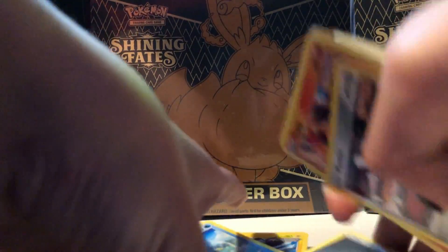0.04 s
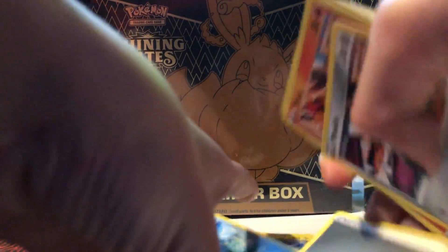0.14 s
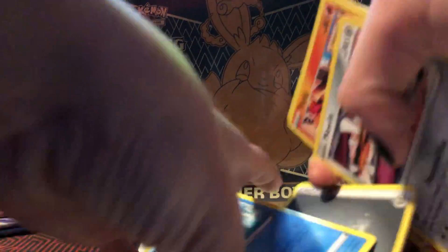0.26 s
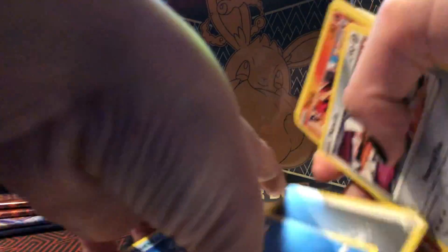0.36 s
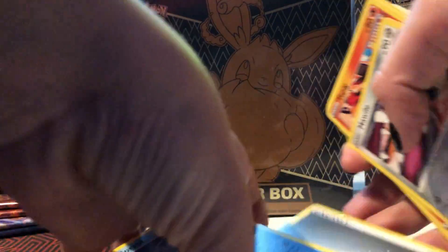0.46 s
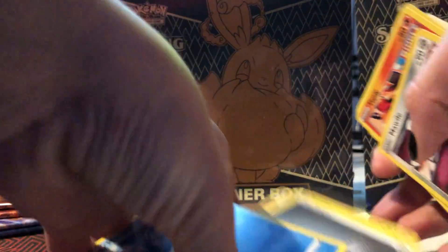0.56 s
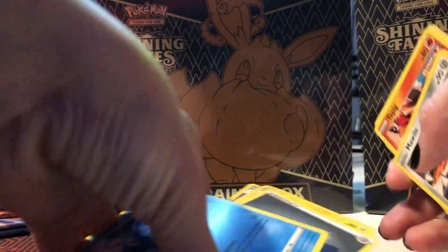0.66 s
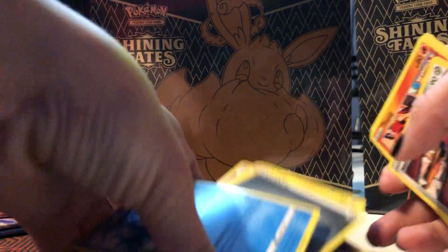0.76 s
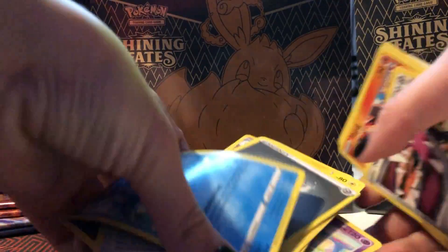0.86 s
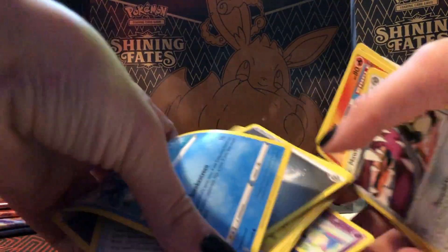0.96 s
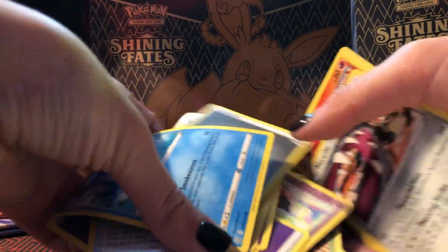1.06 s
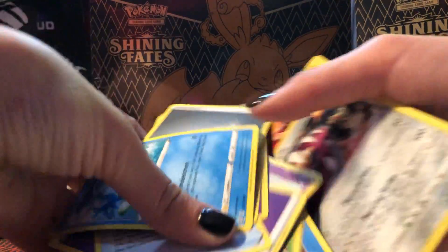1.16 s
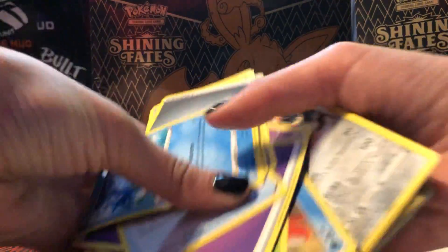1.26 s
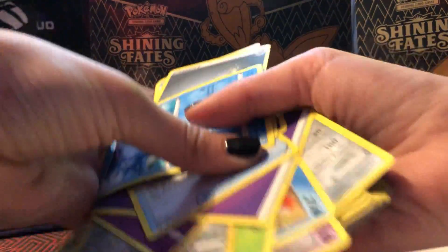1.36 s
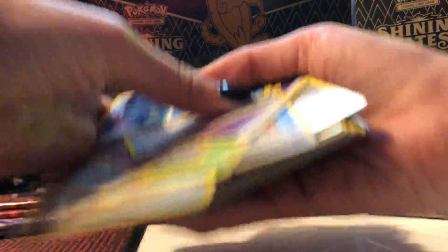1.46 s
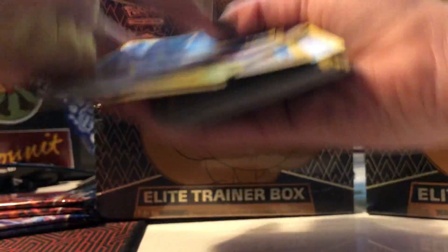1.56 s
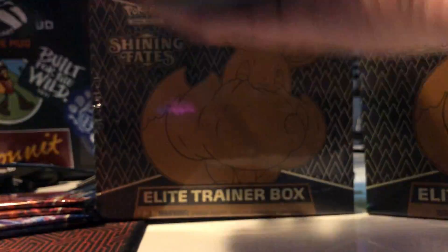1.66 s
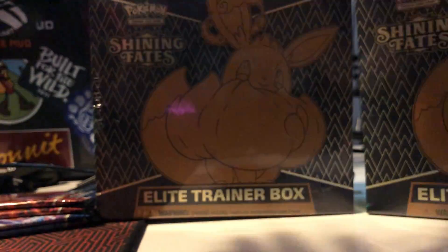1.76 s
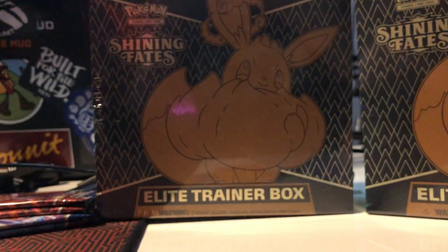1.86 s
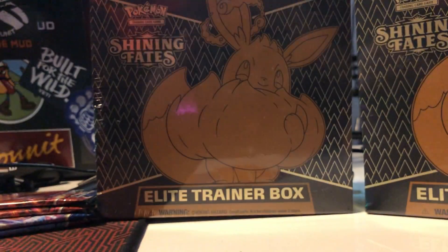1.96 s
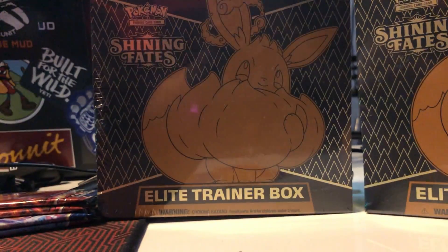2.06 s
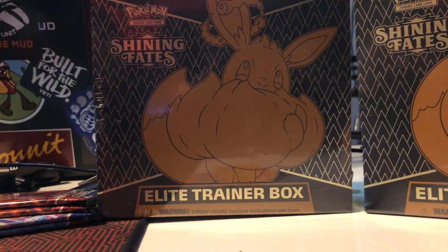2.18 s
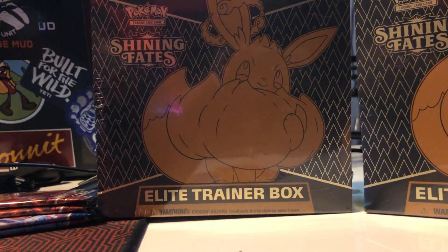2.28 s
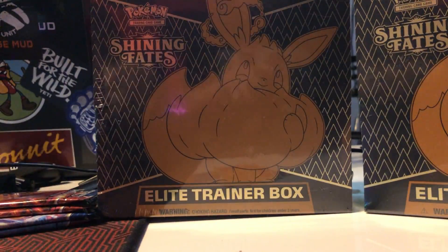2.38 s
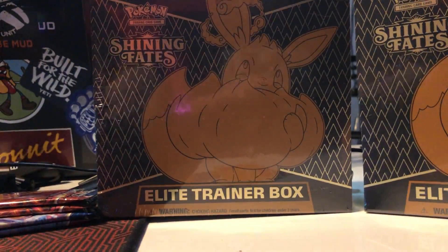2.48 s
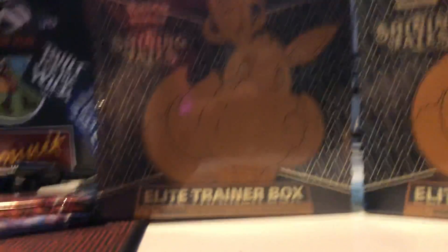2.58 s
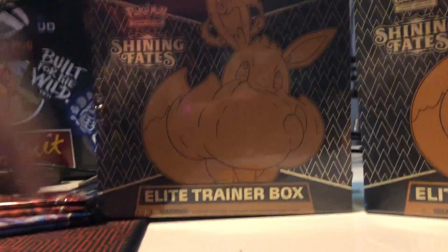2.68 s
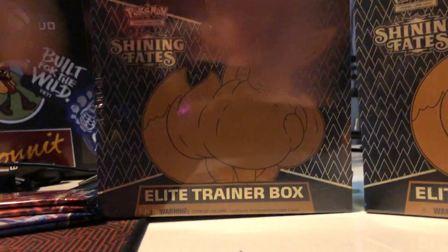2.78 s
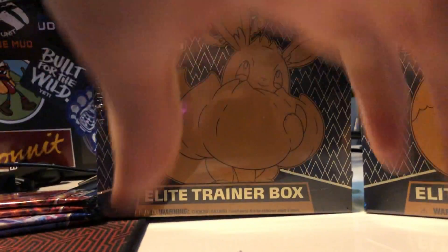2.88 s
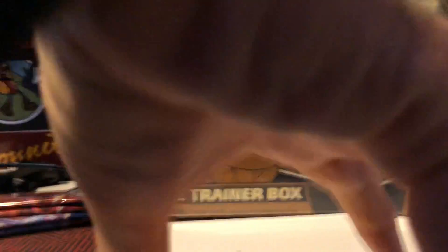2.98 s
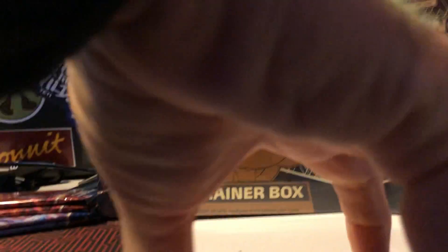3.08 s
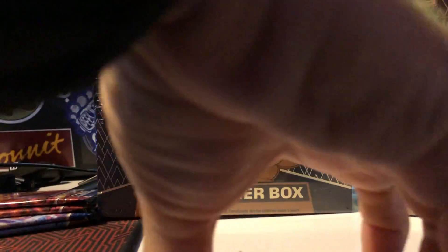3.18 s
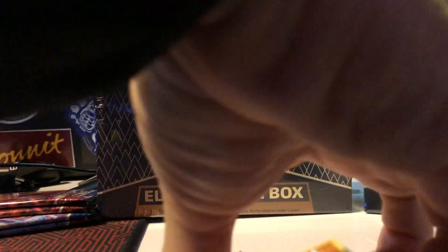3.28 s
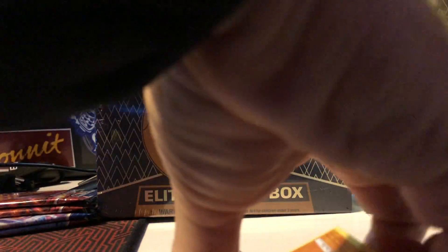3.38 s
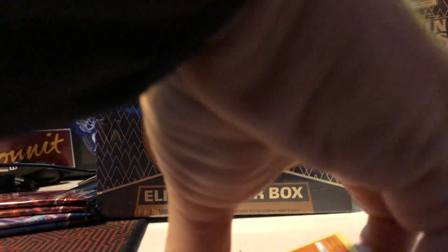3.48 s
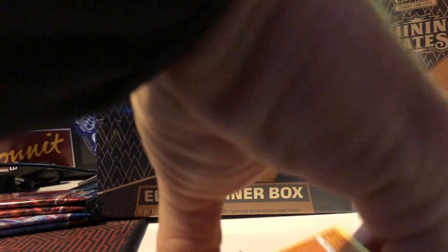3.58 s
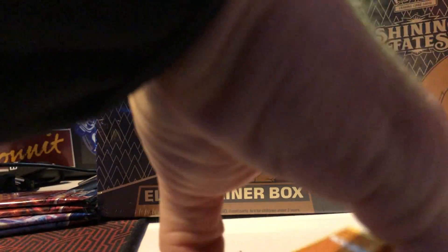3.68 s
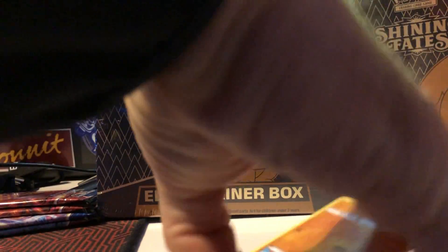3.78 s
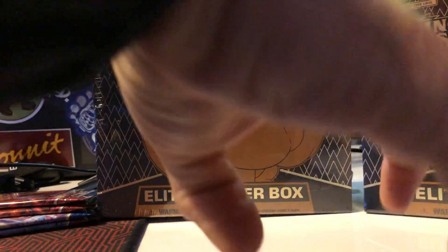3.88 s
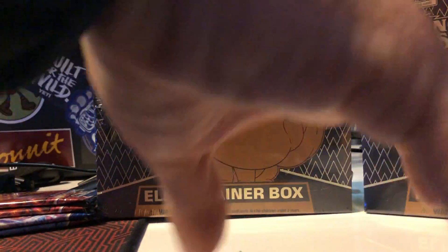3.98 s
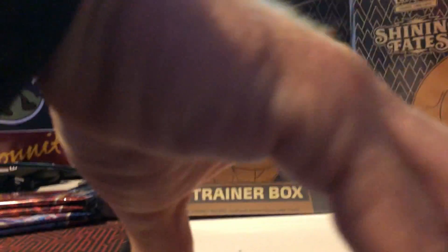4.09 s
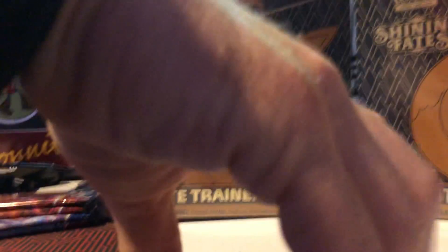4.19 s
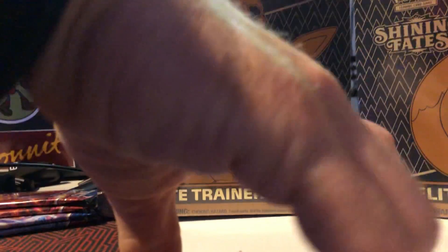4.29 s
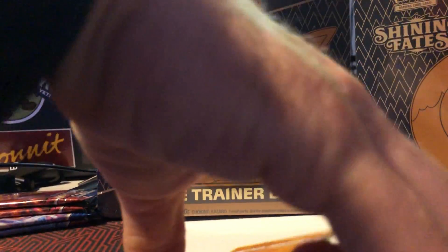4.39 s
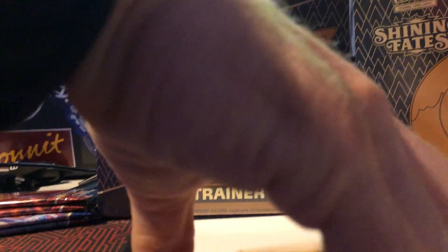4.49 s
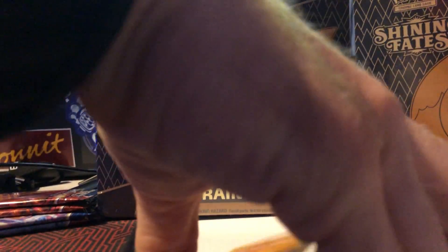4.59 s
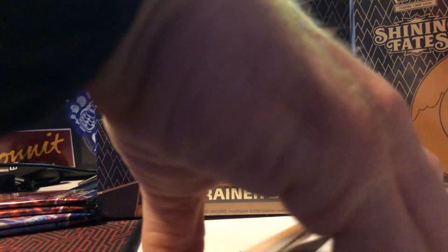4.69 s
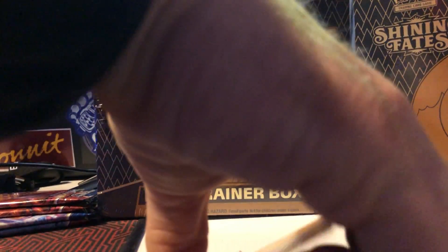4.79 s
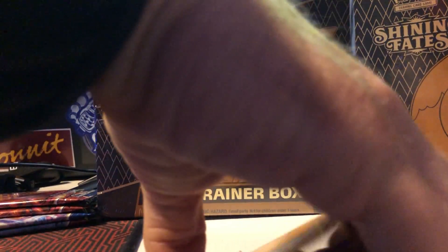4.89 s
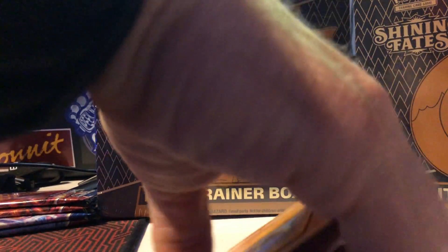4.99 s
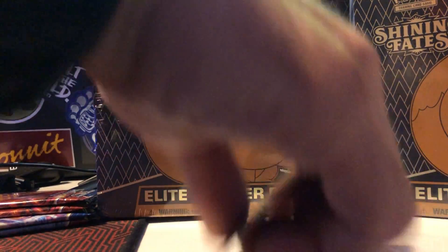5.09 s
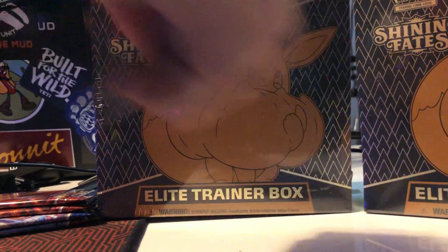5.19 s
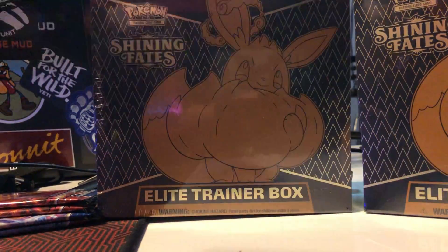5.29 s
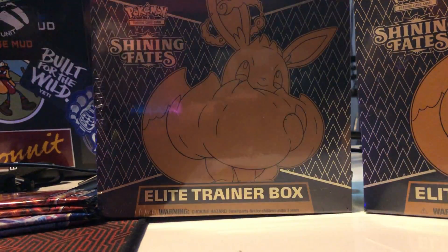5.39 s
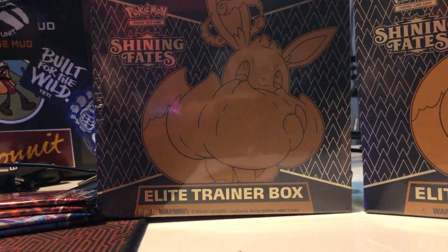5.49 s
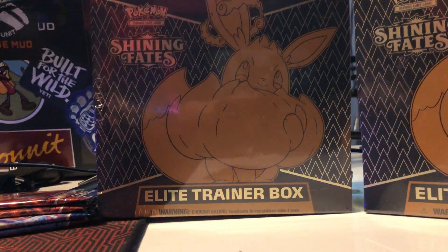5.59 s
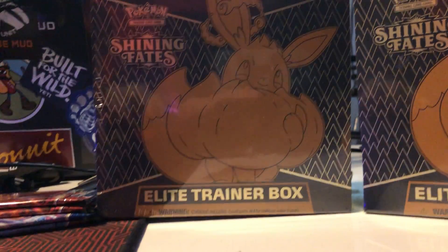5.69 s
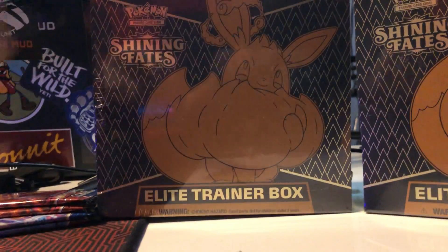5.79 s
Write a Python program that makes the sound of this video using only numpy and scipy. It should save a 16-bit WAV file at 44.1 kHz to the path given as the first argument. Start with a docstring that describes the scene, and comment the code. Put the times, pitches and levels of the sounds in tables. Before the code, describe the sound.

A close microphone in a small, quietly rumbling room with short reverberation and a barely audible hum picks up trading cards handled on a table. From 0.1 to 0.4 s cards scrape and hiss quickly, with a dense burst of crisp snaps near 0.3 s. Lighter slides follow, with clicks around 0.75 s and a sharp one at 1.0 s. Rubbing continues to about 1.55 s; edges sing faintly near 1.2 s and a bright airy swish passes at 1.37 s. After a lull, soft short rustles run from 1.95 to 2.55 s. At about 2.59 s the deck hits the tabletop: a loud, hard, woody knock with card clicks, by far the strongest sound. From 3 s dull finger bumps mix with light slides and small snaps, notably around 3.05, 3.8, 4.2 and 4.5 s. It quiets after 5.3 s, then a brief slide and snappy click cluster come at 5.6 s.

```python
"""Trading cards are handled on a table, close to the microphone, in a quietly rumbling small room.
First they are gathered and slid: shaped grain noise hisses and scrapes, resonant clicks snap, and gliding
bands of noise make edges sing, with one bright airy swish near 1.37 s. Near 2.6 s the deck is knocked
down: tabletop modes, a thud and card clicks. From 3 s fingers bump the table while picking up more cards,
with lighter sliding, snaps and two more songs of an edge between."""
import sys
import numpy as np
from scipy import signal
from scipy.fft import rfft, irfft
from scipy.io import wavfile
from scipy.ndimage import uniform_filter1d

SR = 44100
rng = np.random.default_rng(int(sys.argv[2]) if len(sys.argv) > 2 else 0)


def wav_out(sig):
    """Save sig, one row per channel (or a flat mono array), as 16-bit PCM at SR to the path in sys.argv[1]."""
    wavfile.write(sys.argv[1], SR, np.round(np.clip(np.atleast_2d(sig).T, -1, 1) * 32767).astype(np.int16))


N = 257984

# room rumble: (frequency [Hz], relative density [dB per Hz])
RUMBLE_SPECTRUM = [(20, -20), (40, -22), (60, 2), (80, 0), (125, 3.5), (170, -6), (290, -7.5), (450, -15.5),
                   (800, -21), (1300, -25.5), (3000, -36.5), (6000, -36), (11000, -47), (16000, -40)]
RUMBLE_DB, HUM_HZ, HUM_DB = -50.5, 120.2, -66
# room reverberation: (frequency [Hz], t60 [s])
REVERB_T60_S = [(100, 0.57), (400, 0.36), (1500, 0.24), (5000, 0.16), (14000, 0.27)]
# light touches of resting hands: (start [s], length [s], hiss before trim [dB], scrape before trim [dB],
# sheen above 8 kHz [dB])
LIGHT_TOUCHES = [(.05, 1.63, -60.5, -58, -3), (1.72, .23, -83.5, -64.5, 2), (1.96, 0.73, -61.5, -61.5, -9),
                 (2.74, 0.23, -64.5, -62, -7), (3.02, .96, -60.5, -68.5, -9),
                 (4.0, 0.946, -69.5, -68.5, -5), (5.04, 0.67, -65, -66, -2), (5.7, 0.22, -71, -68, -8)]
FIDGET_DB, FIDGET_S = 1.5, 0.036  # rms and smoothing width of the light-touch variation
# one card pushed over another: (start [s], length [s], hiss before trim [dB], scrape before trim [dB],
# sheen above 8 kHz [dB])
CARD_STROKES = [(.087, 0.071, -42, -54, -6.5), (.192, 0.067, -49.5, -44.5, -11),
                (.279, 0.04, -34.5, -37, -10), (.325, .15, -44, -46.5, -7), (.48, 0.03, -51.5, -66, 1),
                (.595, .093, -47.5, -63, -1), (.715, .09, -76, -56, -4), (.875, 0.22, -56, -55.5, -11),
                (1.088, 0.22, -48, -48, -3), (1.21, 0.18, -47, -52, -4), (1.37, 0.052, -52, -64, 7),
                (1.44, .125, -54, -52.5, -6), (1.957, 0.027, -48.5, -66, 4), (1.99, .12, -54, -59.5, -4),
                (2.163, 0.031, -53, -45, -8), (2.275, .11, -57.5, -59, 1), (2.44, 0.12, -54.5, -55, 5),
                (2.822, 0.042, -59, -65, -4), (2.908, 0.021, -51.5, -64, -7), (3.02, 0.069, -60.5, -66, -5),
                (3.1, .125, -52, -60, 5), (3.435, 0.04, -50.5, -52.5, -2), (3.575, 0.068, -56, -61.5, 0),
                (3.68, 0.12, -52.5, -56.5, -5), (3.822, 0.088, -52.5, -54, 0),
                (4.179, 0.035, -47.5, -52, -6), (4.22, 0.092, -52, -54, 0), (4.343, 0.025, -50.5, -54, -4),
                (4.548, 0.074, -54, -51.5, -6), (4.703, 0.071, -56.5, -60, -3),
                (4.783, 0.072, -54.5, -55, -2), (4.975, 0.034, -50.5, -50.5, -4),
                (5.088, 0.057, -54, -56, -2), (5.18, 0.096, -56.5, -72, -7), (5.453, 0.057, -72, -60, -6),
                (5.617, 0.066, -46.5, -47.5, -2)]
ATTACK_S, SAG_DB_PER_S, RELEASE_S = 0.0097, 22, 0.0072  # sag: strokes only
# friction of glossy faces and of flexing sheets: (frequency [Hz], relative density [dB per Hz])
HISS_SPECTRUM = [(500, -36), (1800, -15), (3000, -2.5), (4300, 1), (6500, -0.5), (10000, -1.5),
                 (15500, 0.5)]
SCRAPE_SPECTRUM = [(100, 14), (300, 8), (800, 12.5), (1500, 2.5), (2400, 9), (3300, -3), (6000, -15.5)]
# card clicks: edges slipping free, one short stroke at 1.15 s, the deck's click at 2.59 s:
# (time [s], flex level [dB], flex resonance [Hz], crack level [dB], t60 [s])
CARD_CLICKS = [(.153, -41, 2900, -55, 0.032), (.2296, -44.5, 2400, -38.5, 0.019),
               (.2754, -35.5, 990, -45, 0.014), (.2867, -33.5, 1510, -52, 0.024),
               (.2918, -29.5, 3530, -39, 0.027), (.3052, -33.5, 1630, -34.5, 0.023),
               (.3215, -36.5, 2850, -36, 0.013), (.385, -33, 3780, -50, 0.017),
               (.7499, -34.5, 2300, -64, 0.013), (.7622, -39, 1580, -61, .02),
               (.83, -51, 1650, -51.5, .022), (.857, -56, 2200, -49.5, 0.03),
               (1.0111, -34, 1180, -24, 0.011), (1.097, -44, 2030, -43, 0.02),
               (1.1457, -47.5, 1360, -46, 0.11), (1.447, -39.5, 1520, -42, 0.023),
               (1.528, -45.5, 2040, -43, 0.042), (1.621, -63, 1420, -44.5, 0.032),
               (1.646, -51.5, 3020, -49, 0.036), (2.0707, -50.5, 3190, -48, 0.03),
               (2.1744, -50, 1860, -46, 0.038), (2.5057, -46, 2580, -45.5, .027),
               (2.5665, -35, 1240, -42, 0.061), (2.5895, -17.5, 1330, -27, 0.04),
               (2.61, -29.5, 1250, -44, .027), (2.618, -35.5, 3180, -54, .033),
               (2.7147, -54.5, 4220, -61, 0.098), (3.6936, -51, 3500, -59, 0.027),
               (4.4905, -56, 1110, -52.5, 0.012), (4.593, -57, 1270, -49, .008),
               (3.808, -45, 3300, -29, 0.0043), (3.8339, -54, 2020, -36, 0.017),
               (3.8704, -47.5, 1420, -44, 0.016), (4.249, -45, 4000, -40, 0.013),
               (4.3, -47.5, 2490, -44.5, 0.045), (5.0403, -48, 2250, -45, .04),
               (5.61, -42, 1670, -45, 0.028), (5.6195, -34, 1630, -39.5, 0.05),
               (5.6254, -34, 2090, -33.5, 0.0066), (5.659, -29.5, 2530, -34, 0.014)]
# crack part of a card click: (frequency [Hz], relative density [dB per Hz])
CRACK_SPECTRUM = [(200, -30), (1000, -16), (3000, -0.5), (6000, 2), (9000, -1), (13000, -1), (16000, -4)]
# chance snaps: rate, level above the rubbing, largest scatter; centre pitch, largest deviation, decay
STRAY_PER_S, STRAY_DB, STRAY_SPREAD_DB = 4.7, 4, 1.5
STRAY_HZ, STRAY_OCTAVES, STRAY_T60_S = 2300, 0.83, 0.025
# deck or fingers land on the table: (time [s], level [dB], hardness [dB per octave],
# weight in the bass [dB], flex of the touching card [dB], its click [dB])
TABLE_BLOWS = [(.286, -38, 2, -9, -37, -54), (0.3063, -45, 6, 2, -46, -52),
               (.7595, -42.5, -3.5, -26, -37, -60), (1.629, -45, -2.5, 6, -54, -64),
               (2.573, -24, -5.5, 4, -38, -52), (2.5862, -15, 1.5, 2, -24, -38),
               (2.6, -21.5, 1, 3, -30, -50), (3.051, -37, -15, -2.5, -38.5, -55),
               (3.1737, -40.5, -5.5, -9, -32, -37.5), (3.55, -52, -3.5, -11, -47, -48.5),
               (4.1845, -36.5, -16, -4, -47, -43), (4.2, -43, -3.5, -12, -39, -51),
               (4.4743, -44, -7, -6, -41, -47), (4.5465, -45.5, 1, 0, -37.5, -45),
               (4.561, -56, -14, -8, -45, -51), (4.6423, -48.5, -6.5, -2, -48, -47),
               (4.802, -48.5, 7, -10, -49, -48), (4.975, -47.5, -19, -8, -53, -49.5),
               (5.6209, -46.5, 2, -19, -37.5, -51), (5.659, -39, 1, 6, -34, -40),
               (5.6869, -41.5, -22, 14, -40.5, -53)]
# tabletop modes: (frequency [Hz], relative level [dB], t60 [s])
TABLE_MODES = [(90, -3, .13), (127, -1, .15), (175, 1, .17), (228, -2, .14), (281, -2, .15), (346, 0, .13),
               (410, -1, .1), (452, -2, .12), (580, -8, .11), (672, -11, .09), (727, -9, .09),
               (801, -4, .08), (927, -3, .075), (1071, -13, .11), (1251, -3, .08), (1350, -6, .06),
               (1425, -4, .07), (1905, -11, .07), (2020, -11, .07), (2298, -15, .08), (2570, -14, .06),
               (3260, -15, .08)]
# dense thud between the modes: (frequency [Hz], relative density [dB per Hz])
THUD_SPECTRUM = [(30, -57), (60, -0.5), (90, 17.5), (170, 1), (450, 15), (650, 13.5), (1400, -68),
                 (2500, -13), (6000, -1), (16000, -119)]
# decay of the thud: (frequency [Hz], t60 [s])
THUD_DECAY_S = [(100, 0.038), (400, 0.07), (1200, 0.017), (4000, 0.01), (12000, 0.031)]
# blow jolting loose cards: level against the blow, speed of settling
JOLT_HISS_DB, JOLT_HISS_DB_PER_S = -16, 620
JOLT_SCRAPE_DB, JOLT_SCRAPE_DB_PER_S = -13.5, 319
TAP_HZ, TAP_T60_S = 830, 0.017  # card at the point of contact
# edges sing, and one bright airy swish near 1.37 s: (start [s], length [s], level [dB],
# start centre [Hz], end centre [Hz], width of each resonator pole [Hz], octave against fundamental [dB])
SONGS_AND_SWISH = [(0.394, 0.068, -50, 2610, 2240, 905, -8), (0.746, 0.069, -57, 2300, 2050, 800, -17),
                   (0.898, 0.088, -49.5, 1400, 1745, 557, -18), (1.201, 0.11, -43, 2167, 2220, 480, -5),
                   (1.25, 0.15, -49, 2190, 2266, 483, -25), (1.367, 0.078, -48.5, 7100, 7580, 2650, -22),
                   (3.083, 0.15, -52.5, 5660, 5660, 1100, -8), (5.639, 0.019, -40, 1790, 2300, 700, -13)]
EDGE_HZ = 15850  # recorder band limit


def amp(db):
    """Decibels to gain."""
    return 10 ** (np.asarray(db) / 20)


def unit(x):
    """Scales to an rms of 1."""
    return x / np.sqrt(np.mean(x ** 2) + 1e-20)


def read(points, hz):
    """Reads a table along a log-frequency axis."""
    f, value = np.transpose(points)
    return np.interp(np.log(hz + 1), np.log(f + 1), value)


def bins(size):
    """Spectrum frequencies for size samples, at least 1 Hz."""
    return np.maximum(np.fft.rfftfreq(size, 1 / SR), 1)


def add(mix, start_s, sound):
    """Mixes a sound in at start_s."""
    part = mix[max(round(start_s * SR), 0):][:len(sound)]
    part += sound[:len(part)]


def colour(x, db):
    """Minimum-phase filter with the given gain per bin; attacks stay sharp."""
    cepstrum = irfft(np.log(amp(np.maximum(db, -100))))
    half = len(cepstrum) // 2
    # fold the cepstrum to make the filter causal
    cepstrum[1:half] *= 2
    cepstrum[half + 1:] = 0
    response = irfft(np.exp(rfft(cepstrum)))[:half]
    return signal.fftconvolve(x, response)[:len(x)]


def attack_level(x, db, size):
    """Sets the rms level of the first size samples of a hit."""
    return amp(db) * x / np.sqrt(np.mean(x[:size] ** 2) + 1e-20)


def ripple(size, width):
    """Smooth random curve of rms 1, with bumps about width points wide."""
    once = uniform_filter1d(rng.standard_normal(size), width)
    return unit(uniform_filter1d(once, width))


def dying_noise(t60_s, size):
    """Noise in which each frequency dies at its own speed."""
    hz, t, z = signal.stft(rng.standard_normal(size), SR, nperseg=256)
    decay = amp(-60 * t / read(t60_s, hz)[:, None])
    return signal.istft(z * decay, SR)[1][:size]


def background():
    """Steady low noise of the room with a faint mains hum."""
    spectrum = rfft(rng.standard_normal(N)) * amp(read(RUMBLE_SPECTRUM, bins(N)))
    rumble = unit(irfft(spectrum, N))
    hum = unit(np.sin(2 * np.pi * HUM_HZ * np.arange(N) / SR))
    return amp(RUMBLE_DB) * rumble + amp(HUM_DB) * hum


def room(x, wet_db=-17, build_s=0.0049):
    """Short reverberation: a soft-onset noise tail whose decay varies with frequency."""
    tail = dying_noise(REVERB_T60_S, size=22016)
    tail *= 1 - np.exp(-np.arange(len(tail)) / SR / build_s)
    return amp(wet_db) * signal.fftconvolve(x, tail / np.linalg.norm(tail))[:N]


def push(length_s, sag_db_per_s):
    """Gain of one hand movement: attack, sagging hold, release."""
    t = np.arange(0, length_s + 10 * RELEASE_S, 1 / SR)
    attack = np.minimum(t / ATTACK_S, 1)
    hold = amp(-sag_db_per_s * np.minimum(t, length_s))
    release = np.exp(-np.maximum(t - length_s, 0) / RELEASE_S)
    return attack * hold * release


def rubbing():
    """Strokes and light touches add in power: dB of hiss, scrape and sheen over time."""
    hiss, scrape, sheen = np.full((3, N), 1e-10)
    fidget = amp(FIDGET_DB * ripple(N, int(FIDGET_S * SR)))
    for moves, sag, unsteady in ((CARD_STROKES, SAG_DB_PER_S, np.ones(N)), (LIGHT_TOUCHES, 0, fidget)):
        for start_s, length_s, hiss_db, scrape_db, sheen_db in moves:
            gain = push(length_s, sag)
            variation = np.roll(unsteady, -round(start_s * SR))[:len(gain)]
            power = (gain * variation) ** 2
            add(hiss, start_s, power * amp(hiss_db) ** 2)
            add(scrape, start_s, power * amp(scrape_db) ** 2)
            # sheen is averaged by hiss power
            add(sheen, start_s, power * amp(hiss_db) ** 2 * sheen_db)
    return 10 * np.log10(hiss), 10 * np.log10(scrape), sheen / hiss


def friction(spectrum, grain_db, grains_per_s, smooth, patchy_db):
    """Fibres catch and let go; the colour drifts as the cards overlap differently."""
    sizes = amp(grain_db * np.minimum(rng.exponential(1, N), 4))
    catches = sizes * (rng.random(N) < grains_per_s / SR)
    drive = unit(catches * rng.choice([-1, 1], N)) + smooth * rng.standard_normal(N)
    hz, t, z = signal.stft(drive, SR, nperseg=512)
    patches = uniform_filter1d(rng.standard_normal(z.shape), size=8, axis=0)
    patches = unit(uniform_filter1d(patches, size=14, axis=1))
    gain_db = read(spectrum, hz)[:, None] + patchy_db * patches
    return unit(signal.istft(z * amp(gain_db), SR)[1][:N])


def papery_ticks(per_s=220, spread_db=5.0, cycles=0.79, count=16):
    """Corners brush past each other: tiny decaying sines, each at the pitch of its own bit of card."""
    out, t = np.zeros(N), np.arange(512) / SR
    for hz in np.geomspace(1100, 9000, count):
        sizes = amp(spread_db * np.minimum(rng.exponential(1, N), 2))
        strikes = sizes * (rng.random(N) < per_s / count / SR)
        tick = np.sin(2 * np.pi * hz * t) * np.exp(-t * hz / cycles)
        out += unit(signal.oaconvolve(strikes, tick)[:N])
    return unit(out)


def sliding(hiss, scrape, sheen, hiss_trim_db=0.5, scrape_trim_db=-2, judder_db=2.0, ticks_db=-7.5):
    """Glossy faces hiss while sheets scrape and tick, all shaken by uneven finger pressure."""
    ticks = amp((hiss + scrape) / 2 + ticks_db) * papery_ticks()
    hiss = jolted(hiss, JOLT_HISS_DB, JOLT_HISS_DB_PER_S)
    scrape = jolted(scrape, JOLT_SCRAPE_DB, JOLT_SCRAPE_DB_PER_S)
    judder = judder_db * ripple(N, 700)
    fine = friction(HISS_SPECTRUM, grain_db=3.8, grains_per_s=3000, smooth=1.2, patchy_db=2.4)
    low = signal.sosfiltfilt(signal.butter(2, 8000, fs=SR, output="sos"), fine)
    # sheen weights the treble against the rest
    fine = (low + amp(sheen) * (fine - low)) / np.sqrt((1 + amp(sheen) ** 2) / 2)
    coarse = friction(SCRAPE_SPECTRUM, grain_db=3.5, grains_per_s=900, smooth=1, patchy_db=3)
    faces = amp(hiss + hiss_trim_db) * fine
    sheets = amp(scrape + scrape_trim_db) * coarse
    return amp(judder) * (faces + sheets + ticks)


def bending(x, lag_s=0.001124):
    """Bending waves travel as the root of frequency, so a click's lows arrive late (lag_s at 1 kHz)."""
    phase = 4 * np.pi * lag_s * np.sqrt(1000 * bins(N))
    return irfft(rfft(x) * np.exp(-1j * phase), N)


def card_clicks(rows, sharpness=2.7, crack_life=0.66, reach=1.9):
    """Each is an impulse with a short chatter, heard as a crack and through the bending card."""
    out, t, hz = np.zeros(N), np.arange(4096) / SR, bins(size=4096)
    flex_chatter, crack_chatter, uneven_db = .4, .2, 1.8
    for start_s, flex_db, flex_hz, crack_db, t60_s in rows:
        a, b = rng.standard_normal((2, len(t)))
        fade_db = -60 * t / t60_s
        card_db = uneven_db * ripple(len(hz), 30)
        # one broad resonance, above which the bending card carries little
        resonance = 1 + (sharpness * (hz / flex_hz - flex_hz / hz)) ** 2
        rolloff = 1 + (hz / flex_hz / reach) ** 4
        bend_db = -10 * np.log10(resonance * rolloff)
        bend = colour((t == 0) + flex_chatter * a * amp(fade_db), bend_db + card_db)
        crack_drive = (t == 0) + crack_chatter * b * amp(fade_db / crack_life)
        crack = colour(crack_drive, read(CRACK_SPECTRUM, hz) + card_db)
        add(out, start_s, attack_level(bend, flex_db, size=220) + attack_level(crack, crack_db, size=220))
    return bending(out)


def stray_snaps(hiss, scrape, count=80):
    """Small snaps at random moments, their level following the rubbing that frees them."""
    rows = []
    for chance, (place, size, pitch) in zip(rng.random(count), rng.uniform(-1, 1, (count, 3))):
        if chance < STRAY_PER_S * N / SR / count:
            at = int((place + 1) / 2 * N)
            db = STRAY_DB + STRAY_SPREAD_DB * size
            hz = STRAY_HZ * 2 ** (STRAY_OCTAVES * pitch)
            rows.append((at / SR, scrape[at] + db, hz, hiss[at] + db, STRAY_T60_S))
    return rows


def blows(thud_db=-8, pivot_hz=500, bass_hz=200):
    """The tabletop rings under each blow; a harder contact is brighter, a heavier one deeper."""
    out, t, hz = np.zeros(N), np.arange(16384) / SR, bins(size=16384)
    ring = np.zeros(len(t))
    for k, (mode_hz, mode_db, t60_s) in enumerate(TABLE_MODES):
        ring += (-1) ** k * amp(mode_db - 60 * t / t60_s) * np.sin(2 * np.pi * mode_hz * t)
    for start_s, db, hardness, weight_db, _, _ in TABLE_BLOWS:
        thud = colour(dying_noise(THUD_DECAY_S, size=len(t)), read(THUD_SPECTRUM, hz))
        contact_db = hardness * np.log2(1 + hz / pivot_hz) + weight_db / (1 + (hz / bass_hz) ** 4)
        hit = colour(unit(ring) + amp(thud_db) * unit(thud), contact_db)
        add(out, start_s, attack_level(hit, db, size=880))
    return out


def contact_snaps():
    """Every blow on the table begins with a dull snap of the card that touches it."""
    return [(s, flex_db, TAP_HZ, click_db, TAP_T60_S) for s, _, _, _, flex_db, click_db in TABLE_BLOWS]


def jolted(level_db, jolt_db, settle_db_per_s):
    """Adds to a rubbing level the brief shiver of the cards after every blow."""
    power, t = amp(level_db) ** 2, np.arange(SR // 2) / SR
    for start_s, db, *_ in TABLE_BLOWS:
        add(power, start_s, amp(db + jolt_db - settle_db_per_s * t) ** 2)
    return 10 * np.log10(power)


def songs_and_swish():
    """Gliding noise band and its octave, in uneven spurts: stick-slip song of an edge or, wide, a swish."""
    out = np.zeros(N)
    for start_s, length_s, db, start_hz, end_hz, width_hz, octave_db in SONGS_AND_SWISH:
        n = int(length_s * SR)
        turn = np.exp(2j * np.pi * np.cumsum(np.linspace(start_hz, end_hz, n)) / SR)
        r = np.exp(-np.pi * abs(width_hz) / SR)
        # double-pole low-passed noise, shifted up to the gliding centre
        noise = rng.standard_normal((4, SR))
        a, b, c, d = signal.lfilter([1], [1, -2 * r, r * r], noise)[:, :n]
        fundamental = unit(((a + 1j * b) * turn).real)
        octave = unit(((c + 1j * d) * turn ** 2).real)
        band = fundamental + amp(octave_db) * octave
        spurts_db = 2.5 * ripple(n, 180)
        add(out, start_s, amp(db) * unit(band * amp(spurts_db)) * signal.windows.tukey(n, .6))
    return out


def scene():
    """Cards and table in the room."""
    hiss, scrape, sheen = rubbing()
    floor = background()
    all_clicks = CARD_CLICKS + contact_snaps() + stray_snaps(hiss, scrape)
    cards = sliding(hiss, scrape, sheen) + card_clicks(all_clicks) + blows() + songs_and_swish()
    return (cards + room(cards) + floor)[None]


def record(dry, low_cut_hz=34):
    """The microphone's bass roll-off and the recorder's band limit."""
    x = signal.sosfilt(signal.butter(2, low_cut_hz, "high", fs=SR, output="sos"), dry)
    band_limit = signal.firwin(301, EDGE_HZ, window=("kaiser", 8), fs=SR)
    return signal.oaconvolve(x, band_limit[None], "same")


dry = scene()
out = record(dry)
wav_out(out)
```